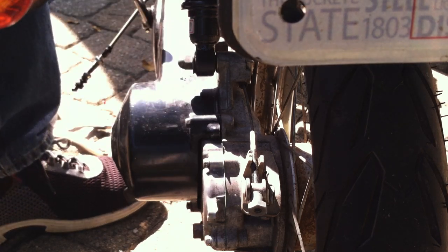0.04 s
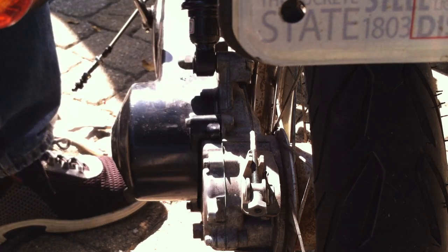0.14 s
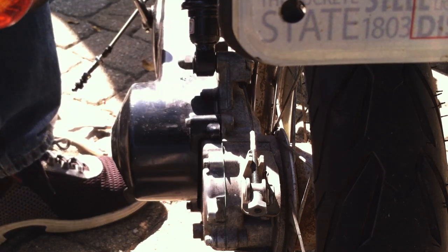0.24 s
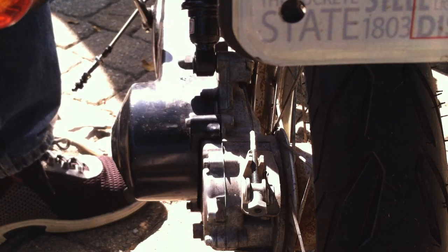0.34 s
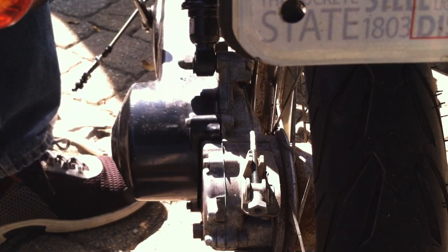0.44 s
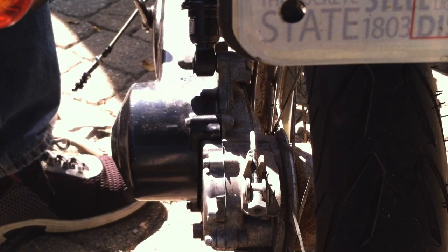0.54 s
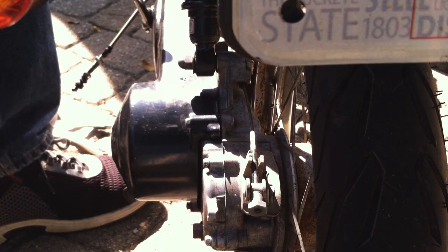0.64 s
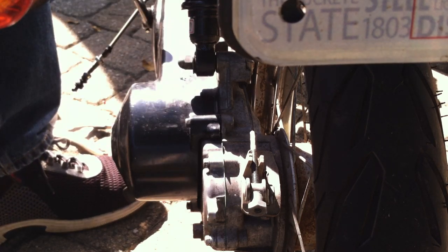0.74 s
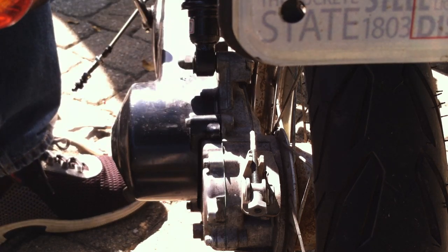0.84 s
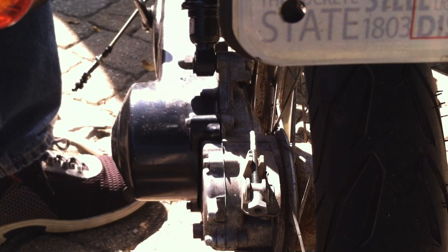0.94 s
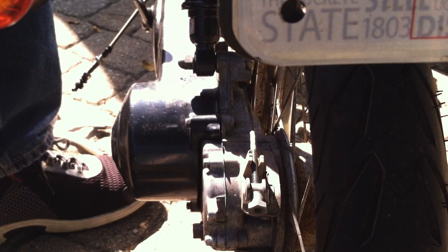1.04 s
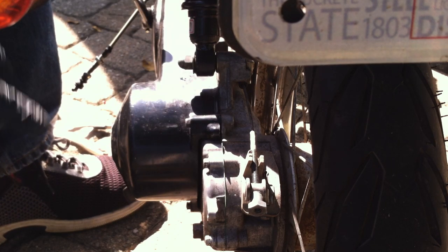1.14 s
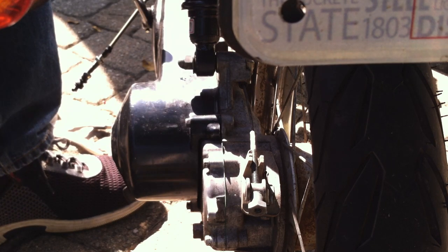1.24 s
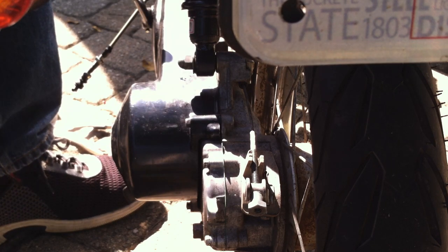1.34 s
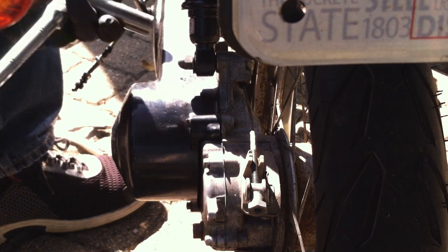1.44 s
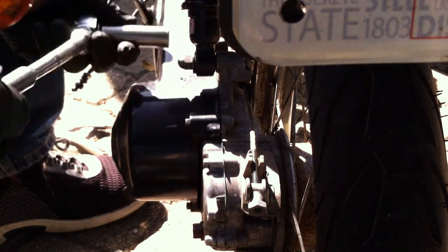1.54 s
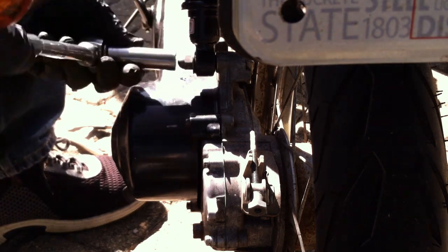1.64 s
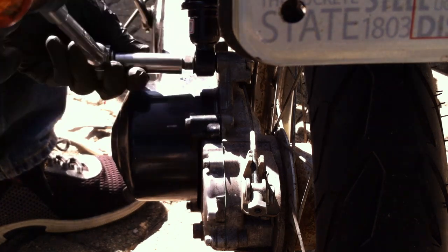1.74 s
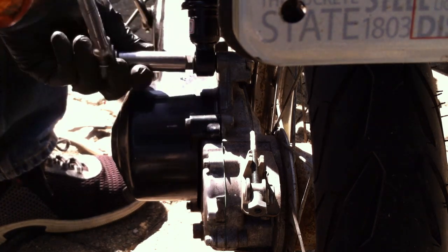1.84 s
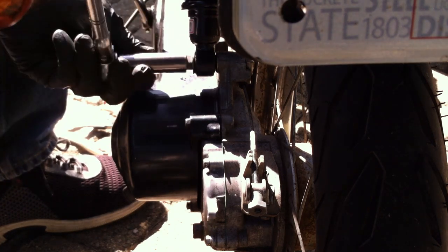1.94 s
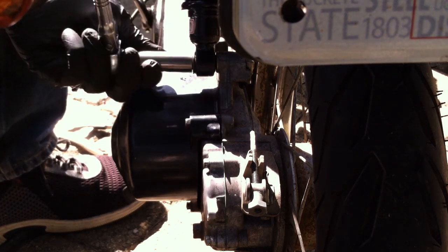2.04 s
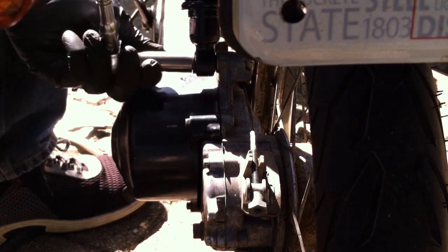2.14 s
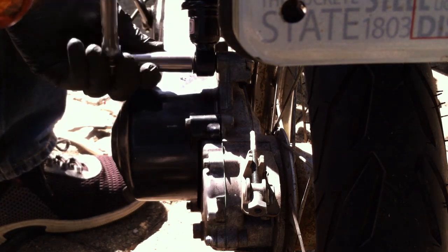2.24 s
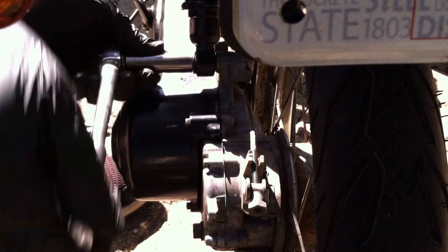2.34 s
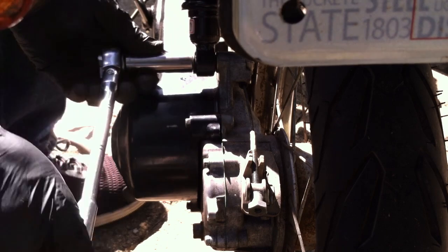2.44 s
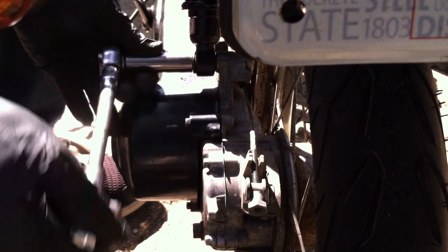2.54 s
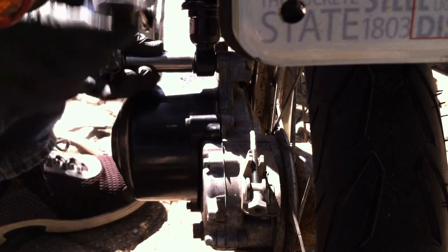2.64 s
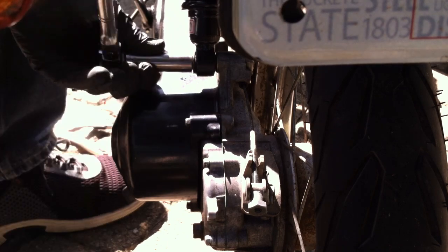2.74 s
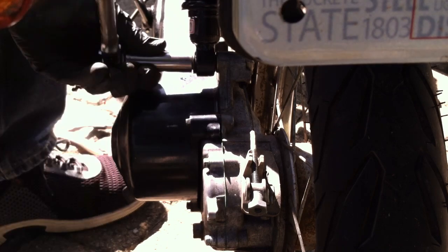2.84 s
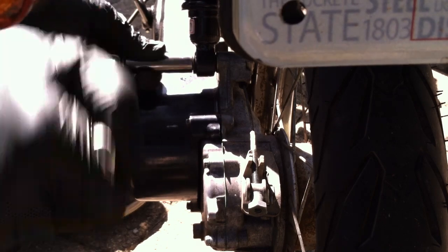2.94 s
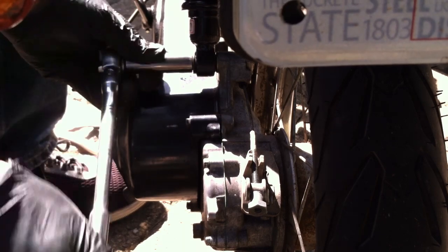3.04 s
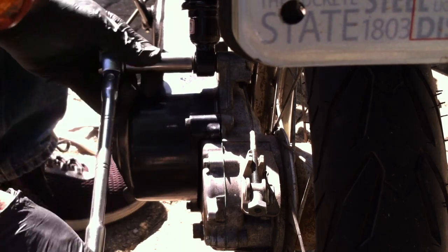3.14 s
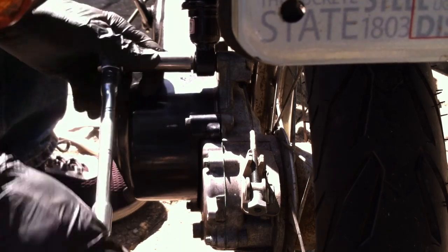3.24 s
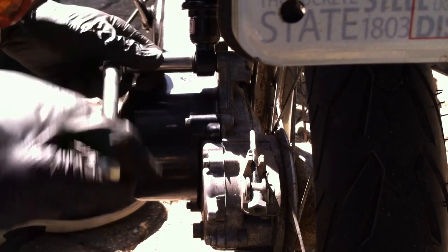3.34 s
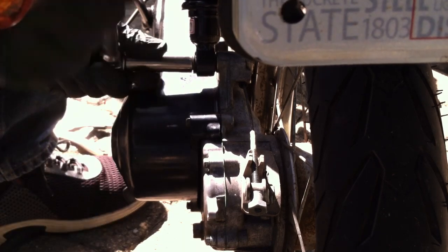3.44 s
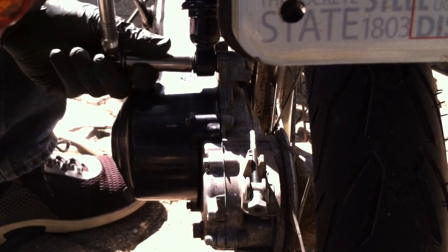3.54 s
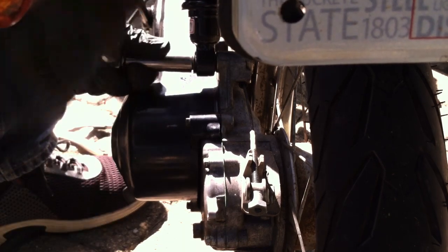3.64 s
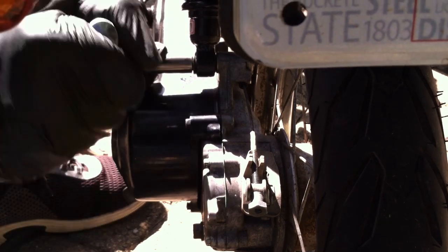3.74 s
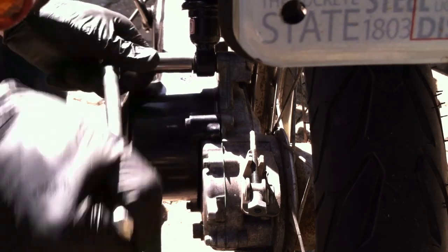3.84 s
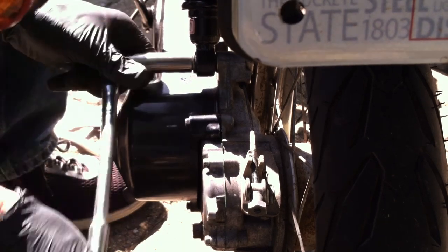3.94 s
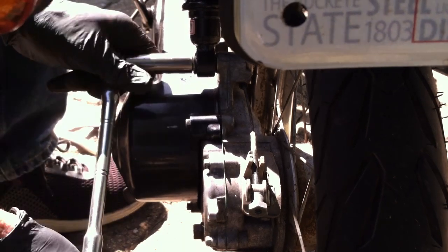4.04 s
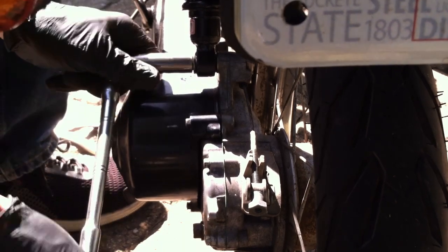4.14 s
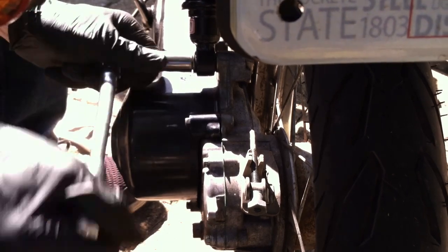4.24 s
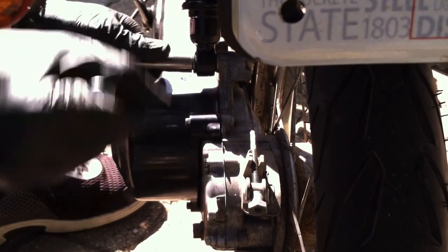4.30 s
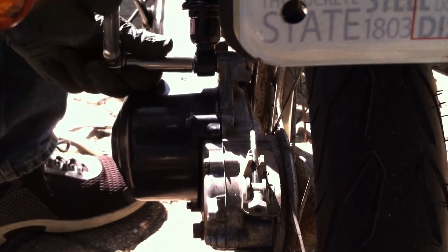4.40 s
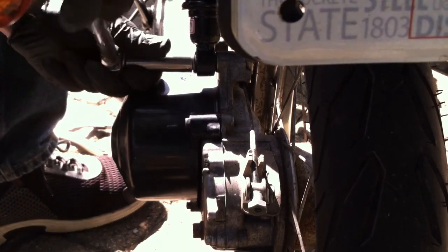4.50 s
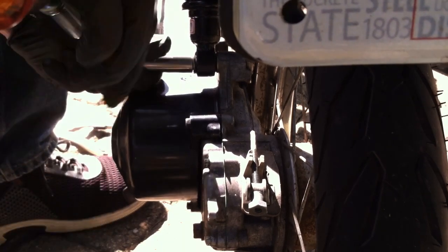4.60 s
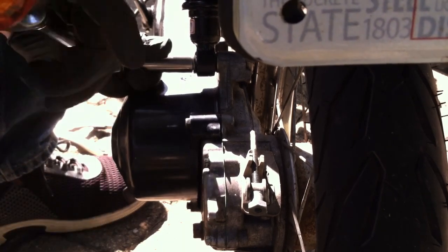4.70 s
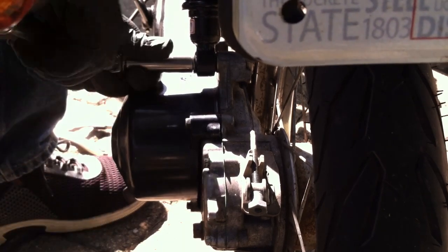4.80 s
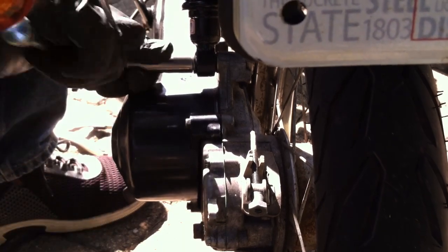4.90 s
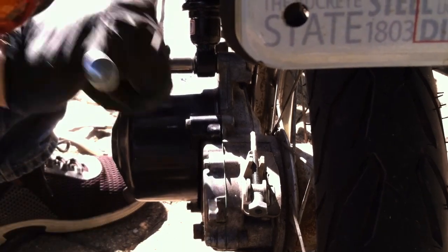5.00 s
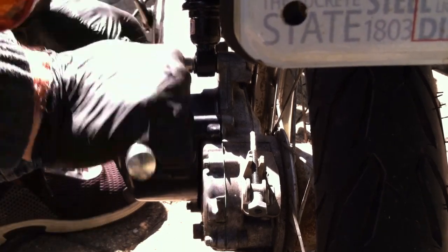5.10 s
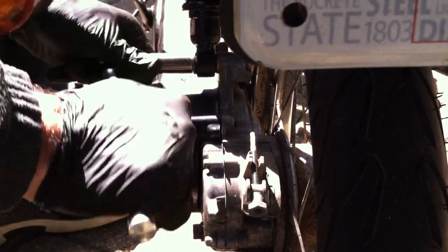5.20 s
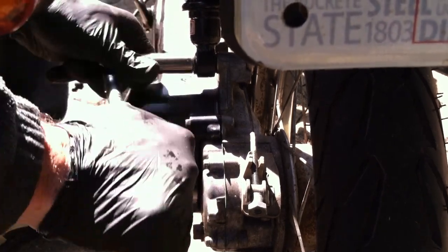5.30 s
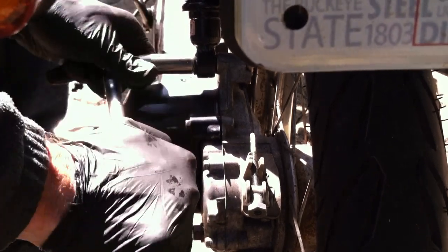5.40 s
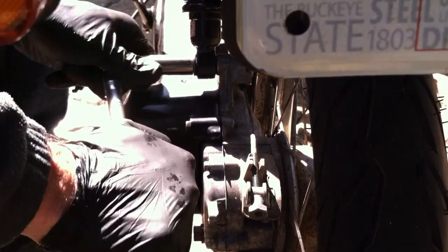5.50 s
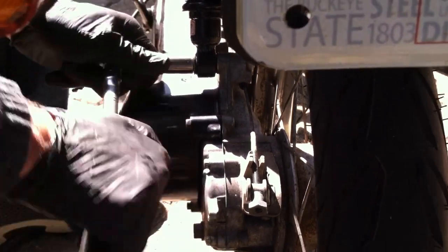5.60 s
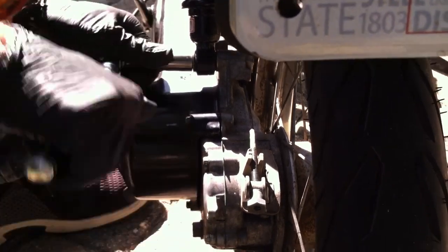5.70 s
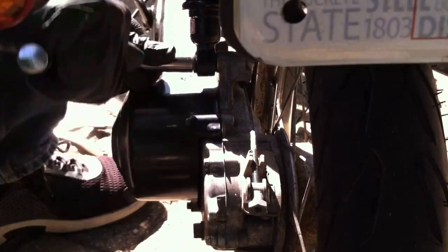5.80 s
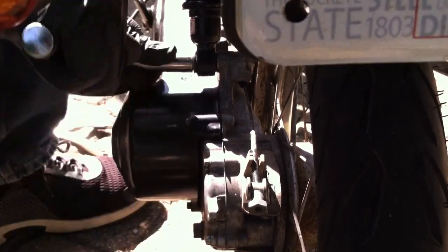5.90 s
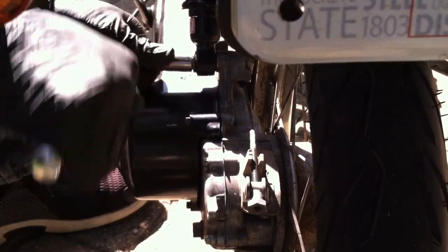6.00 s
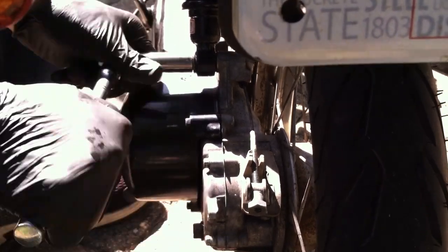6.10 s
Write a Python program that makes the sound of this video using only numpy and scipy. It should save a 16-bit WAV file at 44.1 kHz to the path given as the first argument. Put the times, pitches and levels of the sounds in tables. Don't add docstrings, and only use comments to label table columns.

```python
import sys
import numpy as np
from scipy import signal
from scipy.fft import rfft, irfft
from scipy.io import wavfile
from scipy.ndimage import uniform_filter1d, minimum_filter1d

SR = 44100
rng = np.random.default_rng(int(sys.argv[2]) if len(sys.argv) > 2 else 0)


def to_wav(s):
    ch = np.atleast_2d(s).T
    pcm = np.round(np.clip(ch, -1, 1) * 32767)
    wavfile.write(sys.argv[1], SR, pcm.astype(np.int16))


def voltage_ratio(decibels):
    exponent = np.asarray(decibels, float) / 20
    return 10 ** exponent


N = 271478
TOP_HZ = 15700
LEAD = 220

# frequency in Hz, level in dB, t60 in s.
FRAME_LOW = [(519.6, -4, 0.072), (640, -6.5, 0.1), (800, -8, 0.043), (1052, 4.5, 0.015), (1176, 0, 0.026)]
FRAME_MID = [(1280, 0, 0.048), (1454, -2, 0.031), (1568, 5.5, 0.028), (1820, -1.5, 0.062)]
FRAME_UPPER = [(1800, -8.5, 0.039), (2152, 6, 0.017), (2300, -5, 0.042), (2440, -8, .02)]
FRAME_TOP = [(2937, 3.5, 0.032), (3270, -2, 0.03), (3475, -1, 0.029), (3690, -6, 0.033), (4064, 1, 0.014),
             (4500, -3.5, 0.055)]


def rms_one(x):
    return x / np.sqrt(np.mean(x ** 2) + 1e-20)


def in_time(rows):
    s, *columns = np.transpose(rows)
    return [np.interp(np.arange(N) / SR, s, column) for column in columns]


def band(x, low_hz, high_hz):
    sos = signal.butter(2, [low_hz, min(high_hz, SR / 2.2)], "band", fs=SR, output="sos")
    return signal.sosfilt(sos, x)


def drift(rate_hz):
    r = np.exp(-2 * np.pi * rate_hz / SR)
    noise = rng.standard_normal(N + SR)
    return rms_one(signal.lfilter([1], [1, -2 * r, r * r], noise)[SR:])


def ring(force, hz, t60):
    r = voltage_ratio(-60 / (max(t60, 0.002) * SR))
    w = 2 * np.pi * hz / SR
    return signal.lfilter([0, np.sin(w)], [1, -2 * r * np.cos(w), r * r], force + 1e-18)


def contact(length_ms, creep_ms, spike, rattle):
    t_ms = np.arange(-LEAD, 1800) / SR * 1000
    creep = 0.21 * np.exp(-np.abs(t_ms) / creep_ms)
    after = np.exp(-np.abs(t_ms) / max(length_ms, 0.1)) + rattle * np.exp(-np.abs(t_ms) / 16)
    unevenness = voltage_ratio(4 * rng.standard_normal(len(t_ms)))
    force = np.where(t_ms < 0, creep, after) * rng.standard_normal(len(t_ms)) * unevenness
    force[LEAD] = spike
    return force / np.sqrt(np.sum(force ** 2))


def train(times, forces, levels_db):
    line = np.zeros(N + 2500)
    for s, force, db in zip(times, forces, levels_db):
        start = round(s * SR) - LEAD
        line[start:start + len(force)] += voltage_ratio(db) * force
    return line[:N]


def strike(times, forces, levels_db, modes, spread_db, snap_db, low_hz, high_hz, ring_db=0):
    share = rng.standard_normal((len(times), len(modes)))
    fair = np.sqrt(2 * (high_hz - low_hz) / SR)
    forces = [force * fair / np.linalg.norm(band(force, low_hz, high_hz)) for force in forces]
    out = voltage_ratio(snap_db) * band(train(times, forces, levels_db), low_hz, high_hz)
    for k, (hz, mode_db, t60) in enumerate(modes):
        blow_db = levels_db + ring_db + mode_db + spread_db * share[:, k]
        out += ring(train(times, forces, blow_db), hz, t60) * (-1) ** k
    return out


def grains(per_s, spread_db):
    born = rng.random(N) < per_s / SR
    size_db = spread_db * np.minimum(rng.exponential(1, N), 4)
    return born * voltage_ratio(size_db) * rng.choice([-1, 1], N)


def strokes(rows, rise_db_per_s, fall_db_per_s):
    t = np.arange(N) / SR
    levels = []
    for s, hold_s, db in rows:
        rise = rise_db_per_s * np.clip(s - t, 0, None)
        fall = fall_db_per_s * np.clip(t - s - hold_s, 0, None)
        levels.append(db - rise - fall)
    return np.max(levels, axis=0)


def pawl():
    # time in s, strength in dB, brightness in dB, freedom to ring in dB.
    teeth = [(2.7253, -30, 8.5, -16), (2.745, -28.5, 3, -14), (2.7668, -26.5, 6.5, -4),
             (2.7904, -26, 8.5, 2), (2.818, -27.5, 4, 19), (2.8619, -25.5, 5.5, -15),
             (3.4568, -25.5, 5, -1), (3.486, -27.5, 1.5, 8), (3.512, -29, 2, 2), (3.5389, -28, 0, -7),
             (3.567, -24, -0.5, -9), (3.6029, -25.5, 3, -8), (4.377, -26.5, 0.5, -4), (4.4028, -29, 4, -13),
             (4.4269, -28, -1, -6), (4.451, -26.5, 4, -8), (4.4828, -25, 2.5, 15), (4.5502, -31, 10.5, -9),
             (5.897, -28.5, 0, -8)]
    # frequency in Hz, level in dB, t60 in s.
    handle = [(1620, 4, 0.0089), (2080, 10, 0.014), (2240, 3.5, 0.018), (2660, -2.5, 0.022)]
    body = [(3930, -2.5, 0.013), (5120, -3, 0.019), (6620, 10, 0.0027), (7160, 11, 0.0075),
            (7800, 0.5, 0.0075), (8500, 3.5, 0.008)]
    head = [(9850, -3, .03), (10300, -12, .025), (11300, -8, .012), (12300, -4, .032), (12500, -2, .042),
            (12800, -5, .018)]
    s, peak_db, bright_db, free_db = np.transpose(teeth)
    new_swing = np.diff(s, prepend=0) > 0.2
    swing_start = np.maximum.accumulate(s * new_swing)
    handle_db = -8.5 + 30 * (s - swing_start)
    forces = [contact(length_ms=1.8, creep_ms=1.9, spike=9.7, rattle=0.039) for _ in s]
    thud = strike(s, forces, peak_db + handle_db - 15.5, handle,
                  spread_db=3.5, snap_db=28, low_hz=870, high_hz=3170)
    clack = strike(s, forces, peak_db - 14.5, body,
                   spread_db=3.0, snap_db=32.5, low_hz=3170, high_hz=7800)
    chime = strike(s, forces, peak_db + bright_db - 9.0, head,
                   spread_db=11.5, snap_db=25.5, low_hz=8680, high_hz=12800, ring_db=free_db - 18.5)
    return thud + clack + chime


def drive():
    # time in s, peak in dB, brightness in dB.
    take_ups = [
        (3.459, -21.5, -3),
        (4.284, -15.5, 0),
        (5.822, -35, 1.5),
    ]
    # frequency in Hz, level in dB, t60 in s.
    drive_low = [(1013, -1, .025), (1165, 2, 0.022), (1444, 2.5, 0.033), (1610, 7, 0.025), (1800, -5, .02)]
    drive_high = [(3480, -2.5, 0.027), (3787, 1.5, 0.017), (3955, -7.5, 0.013), (4420, -1, 0.015)]
    s, peak_db, bright_db = np.transpose(take_ups)
    forces = [contact(length_ms=1.55, creep_ms=0.58, spike=3.0, rattle=0.085) for _ in s]
    low = strike(s, forces, peak_db - 15, drive_low,
                 spread_db=4.5, snap_db=30, low_hz=890, high_hz=1890)
    high = strike(s, forces, peak_db + bright_db - 11.5, drive_high,
                  spread_db=-1.5, snap_db=31, low_hz=3240, high_hz=4300)
    crack = band(train(s, forces, peak_db + bright_db - 1), 2000, 12000)
    frame = strike(s, forces, peak_db - 24.5, FRAME_LOW,
                   spread_db=1.0, snap_db=24, low_hz=350, high_hz=900)
    return low + high + crack + frame


def socket():
    # time in s, peak in dB, weight in dB, brightness in dB, contact length in ms.
    knocks = [(1.779, -21.5, -13, -13, 3.9), (1.86, -43.5, 0, -6, 6.1), (1.905, -27.5, -10.5, -16, 3.3),
              (1.91, -25.5, -5.5, -8.5, 2.1), (2.07, -33.5, -10, -11.5, 5.8), (2.13, -30, -7, -26.5, 0.95),
              (2.142, -39, 2, -29, 7.6), (2.313, -44, -7, -17, 2.6), (2.333, -37, -4.5, -20, 7.9),
              (2.675, -38, -6, -22, 2.3), (2.704, -37.5, -3, -15, 1.2), (2.959, -40, -7, -19, 1.8),
              (2.978, -40, -5.5, -10.5, 3.7), (3.405, -40.5, -10, -24, 1.9), (3.76, -40, -6.5, -9.5, 1.1),
              (3.768, -38, -5, -15, 2.5), (4.63, -46.5, -1.5, -6.5, 3.4), (5.815, -40, -13, -6, 4.1),
              (6.127, -48.5, -7, -9, 2.3)]
    # frequency in Hz, level in dB, t60 in s.
    frame_tail = [(1151, 2.5, .1), (2460, -15, .1), (3410, -3.5, 0.13)]
    s, peak_db, low_db, top_db, length_ms = np.transpose(knocks)
    forces = [contact(length_ms=ms, creep_ms=0.15, spike=7.1, rattle=0.14) for ms in length_ms]
    low = strike(s, forces, peak_db + low_db - 6.5, FRAME_LOW,
                 spread_db=-1.5, snap_db=20.5, low_hz=645, high_hz=1380)
    mid = strike(s, forces, peak_db - 14.5, FRAME_MID,
                 spread_db=-2.0, snap_db=37.5, low_hz=1293, high_hz=1782)
    upper = strike(s, forces, peak_db + (low_db + top_db) / 2 - 3.0, FRAME_UPPER,
                   spread_db=6.0, snap_db=37, low_hz=1844, high_hz=2560)
    top = strike(s, forces, peak_db + top_db - 6.5, FRAME_TOP,
                 spread_db=-4.0, snap_db=25.5, low_hz=2500, high_hz=6180)
    crack = band(train(s, forces, peak_db + top_db - 4), 4500, 13000)
    tail = strike(s, forces, peak_db + top_db - 19, frame_tail,
                  spread_db=0.0, snap_db=-15, low_hz=1000, high_hz=3600)
    return low + mid + upper + top + crack + tail


def joints():
    # time in s, peak in dB, pitch in Hz.
    plays = [(0.7043, -48.5, 5270), (0.718, -46.5, 8100), (0.755, -47, 7800), (1.2005, -50, 4080),
             (2.3126, -40, 5010), (2.3363, -39.5, 6440), (2.6226, -47, 5400), (2.646, -40, 5400),
             (2.667, -45, 4820), (2.6917, -40.5, 5170), (2.9337, -44, 7750), (2.958, -42.5, 7040),
             (2.9814, -37.5, 7740), (3.3373, -47, 5100), (3.3966, -48, 4910), (3.7602, -38, 7400),
             (3.769, -38, 5190), (4.3474, -40.5, 4070), (4.6144, -49, 5800), (4.6288, -40.5, 7830),
             (5.0162, -42, 4410), (5.0598, -40.5, 6030), (5.8587, -43, 5370)]
    # time in s, peak in dB, pitch in Hz.
    slips = [(2.7222, -32.5, 9700), (3.56, -42, 11500), (3.5948, -45, 9700), (4.3706, -39, 11760),
             (4.398, -42, 7900), (5.830, -51, 11000)]
    s, peak_db, pitch_hz = np.transpose(plays + slips)
    forces = [contact(length_ms=2.0, creep_ms=0.31, spike=7.1, rattle=0.047) for _ in s]
    ticks = [0.7 * ring(force, hz, 0.0064) + 5.6 * band(force, 3260, 8900)
             for force, hz in zip(forces, pitch_hz)]
    return train(s, ticks, peak_db - 1.0)


def scrape():
    # start in s, hold in s, level in dB.
    rubs = [(1.8, 0.16, -61), (2.31, .02, -57.5), (2.69, .13, -54), (2.95, 0.018, -59.5),
            (3.47, 0.035, -56), (4.32, .17, -56), (5.84, 0.08, -62)]
    rub = band(grains(2500, spread_db=1.0), 344, 4300)
    modes = FRAME_LOW + FRAME_MID + FRAME_UPPER + FRAME_TOP
    ringing = sum(voltage_ratio(db) * ring(rub, hz, t60) for hz, db, t60 in modes)
    return voltage_ratio(strokes(rubs, rise_db_per_s=400, fall_db_per_s=311)) * rms_one(ringing)


def squeak():
    # time in s, pitch in Hz, level in dB.
    path = [
        (4.68, 7150, -90),
        (4.695, 7150, -67),
        (4.75, 7080, -69),
        (4.77, 7080, -90),
    ]
    hz, db = in_time(path)
    return voltage_ratio(db + 2.3 * drift(50)) * np.sin(2 * np.pi * np.cumsum(hz) / SR)


def creak():
    # time in s, pitch in Hz, level in dB.
    path = [(5.72, 793, -64), (5.75, 745, -51), (5.79, 661.4, -49.5), (5.84, 715, -55), (5.9, 709, -55.5),
            (5.97, 640, -55.5), (6.0, 640, -71)]
    hz, db = in_time(path)
    turn = 2 * np.pi * np.cumsum(hz * (1 + 0.0452 * drift(69.6))) / SR
    rub = rms_one(band(grains(3000, spread_db=1.5), 520, 1000))
    tone = 0.77 * np.sin(turn) + 0.28 * np.sin(turn / 2) + 0.31 * np.sin(3 * turn / 2)
    return voltage_ratio(db - 4.5 + 2.4 * drift(60)) * (0.57 * rub + tone)


def rustle():
    # start in s, hold in s, level in dB.
    moves = [(1.3, 0.085, -66.5), (1.58, 0.044, -70.5), (2.31, .02, -72), (2.9, 0.031, -69.5),
             (4.6, 0.096, -67), (4.86, 0.018, -67), (5.08, .04, -70.5), (5.74, 0.053, -68)]
    rest_db = np.where(np.arange(N) / SR < 1.1, -77.5, -73)
    level_db = np.maximum(rest_db, strokes(moves, rise_db_per_s=76, fall_db_per_s=71)) + 3.5
    fibres = band(band(grains(9000, spread_db=2.5), 1630, 11000), 800, 10000)
    return voltage_ratio(level_db) * rms_one(fibres)


def outdoors():
    # frequency in Hz, spectral density in dB per Hz.
    distant = [(15, -70), (25, -8), (43, -33.5), (108, -3), (238, -2.5), (409, -10), (443, -9.5),
               (666, -10), (805, -16), (873, -9), (6160, -26.5), (7860, -30), (9500, -36.5), (15100, -126),
               (16400, -69)]
    # frequency in Hz, level in dB.
    hum = [(150, -73), (300, -73)]
    spectrum_hz = np.maximum(np.fft.rfftfreq(N, 1 / SR), 1)
    corner_hz, density_db = np.transpose(distant)
    colour = voltage_ratio(np.interp(np.log(spectrum_hz), np.log(corner_hz), density_db))
    air = rms_one(irfft(rfft(rng.standard_normal(N)) * colour, N))
    traffic = voltage_ratio(-59.5 + 0.237 * np.arange(N) / SR) * air

    song_hz, width_hz = 8020, 610
    song = band(rng.standard_normal(N), song_hz - width_hz / 2, song_hz + width_hz / 2)
    insects = voltage_ratio(-73.5 + 0.29 * drift(2.0) + 1.6 * drift(36)) * rms_one(song)

    motor = 0
    for hz, db in hum:
        level = voltage_ratio(db + 4.6 * drift(2.9))
        turns = hz * np.cumsum(1 + 0.015 * drift(3.22)) / SR
        motor = motor + level * np.sin(2 * np.pi * turns)
    return traffic + insects + motor


def echoes(x):
    dull = signal.lfilter([0.6], [1, -0.4], x)
    paths = [(1.6, -14.0), (4.1, -12), (8.5, -21), (15, -43.0)]   # (delay ms, level dB)
    return x + sum(voltage_ratio(db) * np.roll(dull, round(ms * SR / 1000)) for ms, db in paths)


def scene():
    steel = pawl() + socket() + drive() + joints()
    steel = signal.sosfilt(signal.butter(2, 330, "high", fs=SR, output="sos"), steel)
    steel = signal.sosfilt(signal.butter(4, 14000, fs=SR, output="sos"), steel)
    mono = echoes(steel) + rustle() + scrape() + creak() + squeak() + outdoors()
    return np.array([mono, mono])


def thin_treble(x):
    mask_db, mask_ms, mask_from_hz = 25, 19, 4200
    hz, _, cells = signal.stft(x, SR, nperseg=256)
    power = uniform_filter1d(np.abs(cells) ** 2, size=7, axis=0)
    treble = power[hz > 4500].mean(axis=0)
    after = int(mask_ms * SR / 128000)
    loudest = -minimum_filter1d(-treble, size=after + 5, origin=2)
    spared_db = 12.0 * np.clip(1 - (hz[:, None] - mask_from_hz) / 2000, 0, 9)
    margin_db = 10 * np.log10(power / loudest + 1e-12) + mask_db + spared_db
    return signal.istft(cells * np.clip(margin_db / 3, 0.01, 1), SR, nperseg=256)[1][:N]


def top_cut(x):
    return signal.sosfilt(signal.butter(12, 16500, fs=SR, output="sos"), x)


def record(dry):
    mono = signal.sosfilt(signal.butter(2, 40, "high", fs=SR, output="sos"), dry[0])
    hiss = rms_one(band(rng.standard_normal(N), 11000, TOP_HZ))
    mono = mono + voltage_ratio(-90.5) * hiss
    mono = thin_treble(signal.sosfilt(signal.butter(12, TOP_HZ, fs=SR, output="sos"), mono))
    return top_cut(np.array([mono, mono]))


dry = scene()
out = record(dry)
to_wav(out)
```